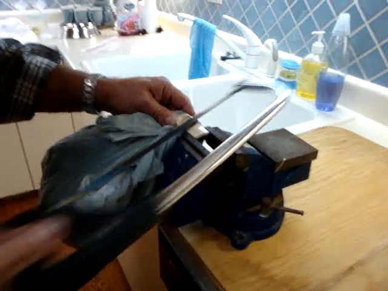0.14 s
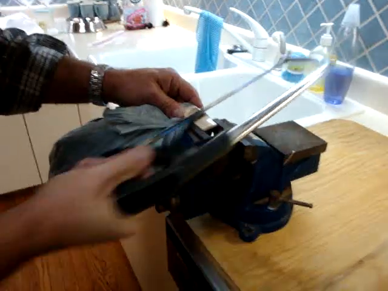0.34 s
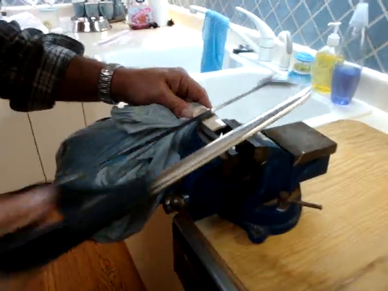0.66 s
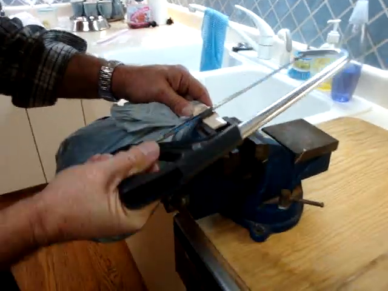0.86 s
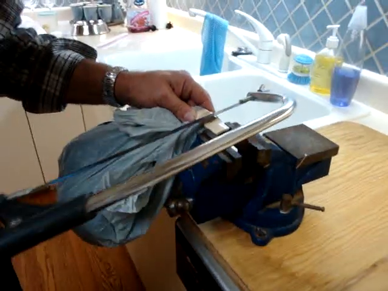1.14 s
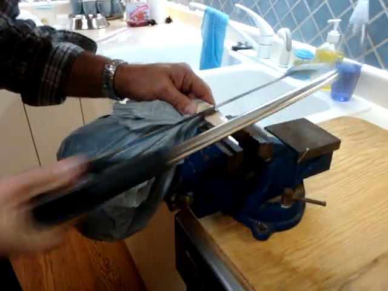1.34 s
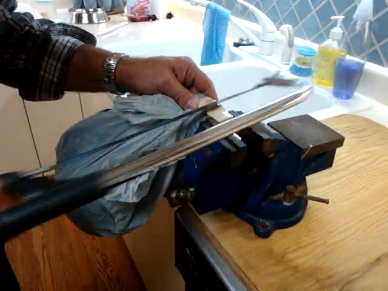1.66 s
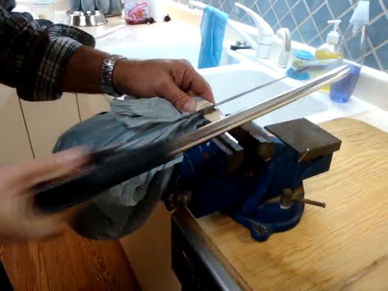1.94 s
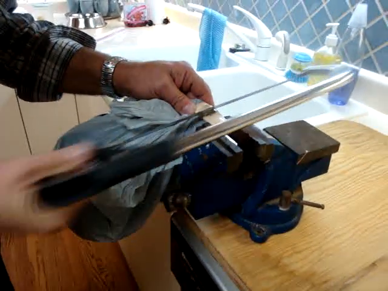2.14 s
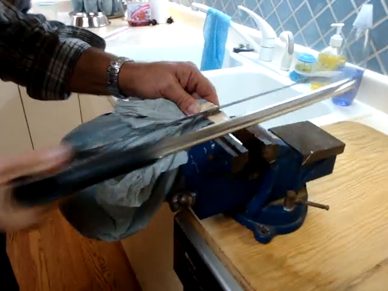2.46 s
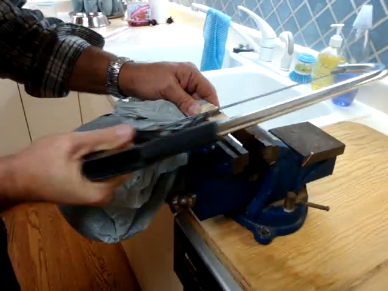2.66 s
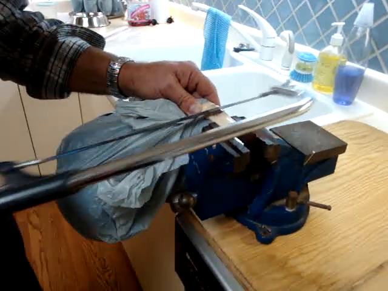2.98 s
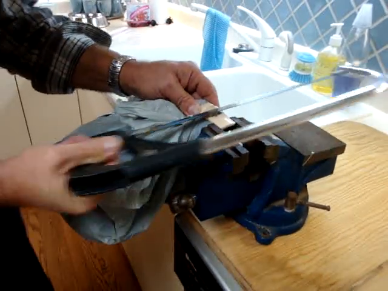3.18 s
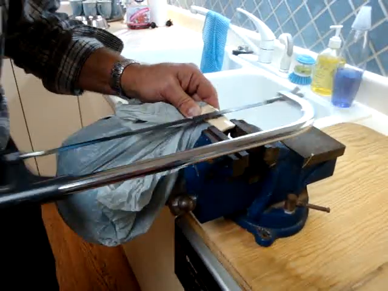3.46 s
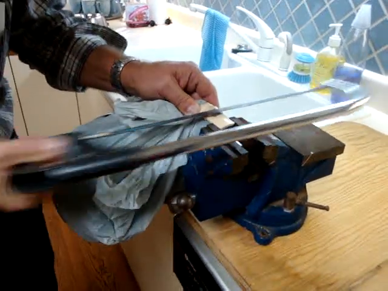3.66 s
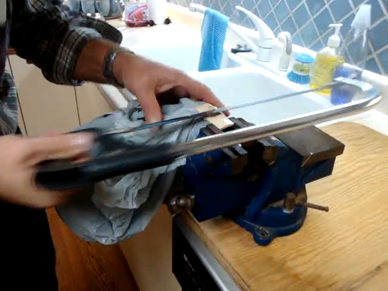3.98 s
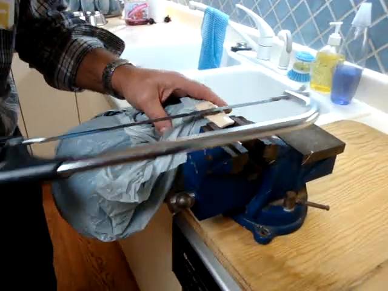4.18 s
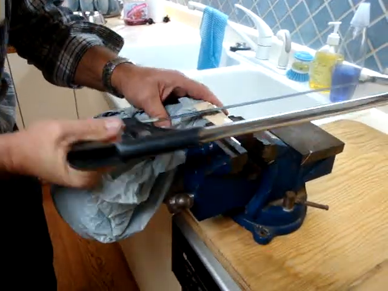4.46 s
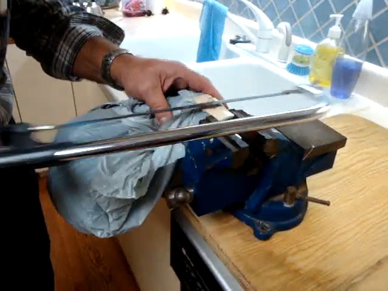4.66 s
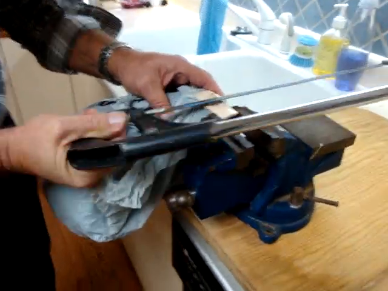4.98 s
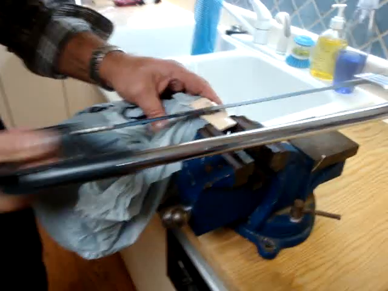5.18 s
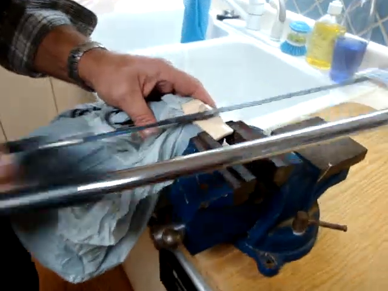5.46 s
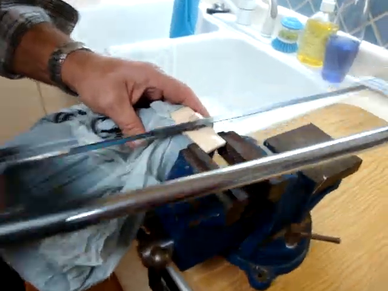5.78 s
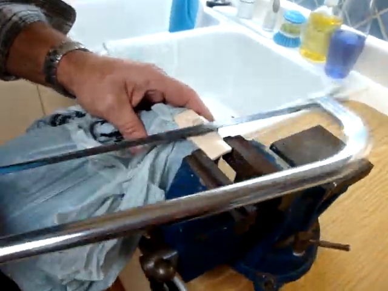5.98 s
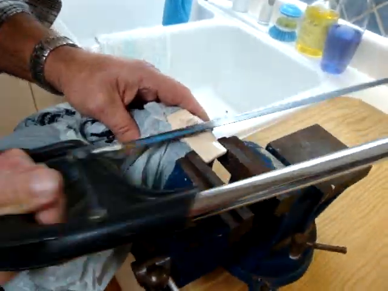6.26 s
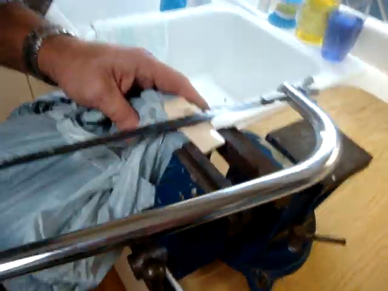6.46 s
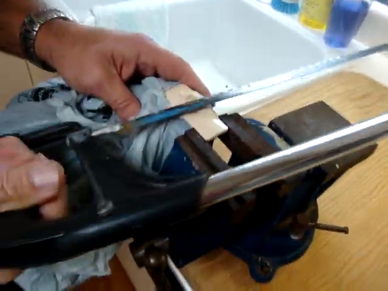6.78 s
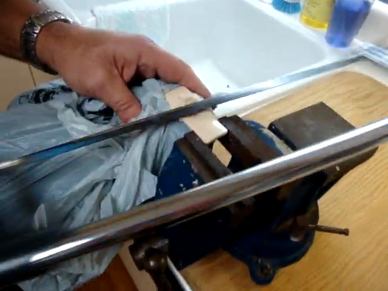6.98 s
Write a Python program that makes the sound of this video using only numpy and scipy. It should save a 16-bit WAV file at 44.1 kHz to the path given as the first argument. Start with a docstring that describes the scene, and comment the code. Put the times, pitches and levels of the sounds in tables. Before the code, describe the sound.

Close, rough sawing of a small hard piece, about three and a half gritty strokes a second, each with a gliding groan, and faint fan-like rush behind.

```python
"""A hacksaw cuts a hard plastic piece held in a bench vise, in quick push and pull strokes.
Teeth strike at a rate that follows the blade's speed: a gliding tone, grinding, chip rasp and dust hiss
ring through frame resonances, and now and then the piece chatters with the teeth.
Two dull thumps of the camera being handled are sums of decaying modes; a small hard room answers with
decaying noise tails. An appliance adds wavering hum lines and a steady rush of coloured noise."""
import sys
import numpy as np
from scipy import signal
from scipy.fft import rfft, irfft, next_fast_len
from scipy.io import wavfile
from scipy.ndimage import uniform_filter1d, map_coordinates

SR = 44100
rng = np.random.default_rng(int(sys.argv[2]) if len(sys.argv) > 2 else 0)


def log_audio(samples):
    """Write samples as a 16-bit WAV file to the path given in sys.argv[1]."""
    # one column per channel
    frames = np.atleast_2d(samples).T
    # limit to full scale, then quantise
    limited = np.clip(frames, -1, 1)
    pcm = np.round(limited * 32767).astype(np.int16)
    wavfile.write(sys.argv[1], SR, pcm)


N = 313859
TIME_S = np.arange(N) / SR


def amp(db):
    """Decibels to gain."""
    return 10 ** (np.asarray(db) / 20)


def unit(x):
    """Scale to rms 1."""
    return x / np.sqrt(np.mean(x ** 2) + 1e-20)


def along(points, hz):
    """(hz, value) points interpolated on a log frequency axis."""
    point_hz, value = np.transpose(points)
    return np.interp(np.log(hz + 1), np.log(point_hz + 1), value)


def wobble(rate_hz):
    """Smooth random curve with rate_hz knots a second."""
    knots = rng.standard_normal(int(N * rate_hz / SR) + 4)
    return map_coordinates(knots, [TIME_S * rate_hz])


def filtered(x, response):
    """x times a response of frequency, over a padded FFT."""
    size = next_fast_len(N + SR // 2)
    hz = np.fft.rfftfreq(size, 1 / SR)
    return irfft(rfft(x, size) * response(hz), size)[:N]


def coloured(x, spectrum):
    """x weighted by the given spectrum, at rms 1."""
    return unit(filtered(x, lambda hz: amp(along(spectrum, hz))))


# appliance hum lines: hz, level_db (rms)
HUM_LINES = [(102, -72), (199, -69), (222, -64.5), (291, -63), (399, -57.5), (528, -56.5), (630, -56),
             (848, -54)]
# spectrum of the air rush: hz, density_db (dB per Hz, relative)
AIR_SPECTRUM = [(20, -27), (40, -35), (65, -11.5), (100, -11.5), (135, -9), (200, 7), (260, 2), (400, 4.5),
                (600, 1), (850, -12), (1300, -6.5), (2200, -22), (4000, -21), (10000, -68)]


def appliance(waver_rad=0.84):
    """Steady rush of air under hum lines of slightly wandering phase."""
    hum = np.zeros(N)
    for hz, level_db in HUM_LINES:
        phase = 2 * np.pi * hz * TIME_S + waver_rad * wobble(12)
        hum += amp(level_db) * np.sqrt(2) * np.sin(phase)
    return hum + amp(-50) * coloured(rng.standard_normal(N), AIR_SPECTRUM)


# decay of the room: hz, t60_s
ROOM_DECAY = [(200, 0.41), (1500, 0.15), (10000, 0.06)]


def room(x, count=20):
    """Short random tails, treble dying first, crossfaded so that no single tail colours the whole."""
    out = np.zeros(N)
    for k in range(count):
        distance = np.abs(np.linspace(0, count - 1, N) - k)
        share = np.sqrt(np.maximum(1 - distance, 0))
        live = np.flatnonzero(share)
        first = live[0]
        hz, t_s, noise = signal.stft(rng.standard_normal(SR // 2), SR, nperseg=256)
        decay = amp(-60 * t_s / along(ROOM_DECAY, hz)[:, None])
        tail = signal.istft(noise * decay, SR, nperseg=256)[1]
        tail /= np.linalg.norm(tail)
        answer = signal.fftconvolve(x[live] * share[live], tail)[:N - first]
        out[first:first + len(answer)] += answer
    return out


# dull thumps of the camera being handled: start_s, level_db (relative)
HANDLING_THUMPS = [(5.404, -35), (5.744, -41)]
# modes of a thump: hz, level_db (relative), t60_s
THUMP_MODES = [(92.46, -16, 0.35), (125, -8, 0.22), (186.4, -10.5, 0.48), (333, 5, 0.072)]


def handling_thumps(attack_s=0.0039):
    """The handled camera thumps dully: low modes ring and decay exponentially."""
    out = np.zeros(N)
    for start_s, thump_db in HANDLING_THUMPS:
        t_s = np.maximum(TIME_S - start_s, 0)
        ring = np.zeros(N)
        for hz, mode_db, t60_s in THUMP_MODES:
            ring += amp(mode_db - 60 * t_s / t60_s) * np.sin(2 * np.pi * hz * t_s)
        out += amp(thump_db) * ring * (1 - np.exp(-t_s / attack_s))
    return out


# resonances of the saw frame and the clamped piece: hz, width_hz, level_db (over the direct sound)
FRAME_MODES = [(587, 47, -11), (762, 220, -5.5), (1067.5, 51, -5.5), (1315, 39, -5.5), (1592, 55, 1.5),
               (1722, 74, 1.5), (1918, 112, 4.5), (2117, 31, -1.5), (2355, 45, 1), (2520, 180, -2.5),
               (2695, 32, -6.5), (2969, 75, 2), (3780, 145, -8), (4620, 150, -11), (5140, 38, -4.5),
               (5500, 41, -1), (6250, 40, -8.5), (6860, 50, -2.5)]


def frame(x):
    """A force heard directly and through the band-pass resonances of frame and piece."""
    def response(f):
        total = 1
        for hz, width_hz, level_db in FRAME_MODES:
            damping = 1j * f * width_hz
            total = total + amp(level_db) * damping / (hz * hz - f * f + damping)
        return total

    return filtered(x, response)


LAST_STOP_S = 7.17  # end of the last stroke


def stroke_phase(start_s, middle_s):
    """Strokes done so far: whole at every turn, a half at the given moment inside each stroke."""
    marks_s = np.append(np.column_stack([start_s, middle_s]), LAST_STOP_S)
    return np.interp(TIME_S, marks_s, np.arange(len(marks_s)) / 2)


# strokes, pull and push in turn: start_s, fastest_s, hardest_s (hardest press), top_hz (tooth rate),
# sing_db (tone clarity), bite_db, rasp_db, hiss_db, turn_db (scrape at the turn before); levels relative
SAW_STROKES = [(-0.22, -0.06, -0.067, 1000.0, 0.0, -30.0, -32.0, -44.0, -53.0),
               (0.06, 0.219, 0.21, 1320.0, 3.0, -30.5, -28.5, -39.0, -56.5),
               (0.369, 0.512, 0.485, 1050.0, 8.5, -30.5, -31.5, -39.0, -53.5),
               (0.649, 0.805, 0.824, 1050.0, -5.0, -31.5, -31.5, -39.5, -54.0),
               (0.939, 1.084, 1.025, 1090.0, 1.0, -27.5, -33.0, -38.0, -57.5),
               (1.236, 1.388, 1.423, 1110.0, 1.5, -31.0, -30.5, -33.5, -57.0),
               (1.519, 1.674, 1.62, 990.0, 3.5, -34.0, -35.5, -38.5, -55.5),
               (1.82, 1.99, 1.965, 1120.0, -2.5, -29.5, -28.0, -30.0, -57.5),
               (2.107, 2.248, 2.215, 950.0, -2.0, -35.0, -36.5, -43.0, -52.5),
               (2.395, 2.557, 2.598, 980.0, -2.0, -30.0, -29.5, -33.0, -53.0),
               (2.688, 2.849, 2.81, 960.0, 0.5, -36.0, -36.5, -39.5, -55.5),
               (3.002, 3.155, 3.197, 880.0, -0.5, -34.5, -31.5, -35.0, -55.0),
               (3.31, 3.461, 3.402, 910.0, -2.0, -33.5, -37.0, -37.0, -56.5),
               (3.598, 3.74, 3.776, 830.0, -2.5, -30.5, -32.5, -34.0, -53.0),
               (3.88, 4.093, 4.088, 730.0, 2.0, -36.0, -38.0, -37.0, -49.0),
               (4.245, 4.359, 4.402, 950.0, -4.0, -28.0, -32.5, -34.0, -49.5),
               (4.512, 4.651, 4.612, 820.0, 2.0, -35.0, -35.5, -41.5, -50.5),
               (4.808, 4.938, 4.974, 990.0, -7.0, -27.5, -32.5, -33.5, -49.5),
               (5.092, 5.265, 5.218, 1120.0, -1.5, -32.5, -34.5, -40.5, -51.5),
               (5.4, 5.555, 5.578, 1090.0, -2.0, -27.5, -32.0, -34.5, -57.0),
               (5.694, 5.86, 5.775, 1000.0, 1.0, -32.5, -33.0, -38.5, -58.5),
               (5.988, 6.139, 6.167, 1140.0, -1.0, -31.5, -31.5, -33.5, -54.0),
               (6.26, 6.425, 6.385, 980.0, -2.0, -28.5, -32.0, -36.5, -51.5),
               (6.578, 6.728, 6.745, 1080.0, -1.5, -29.0, -31.5, -36.0, -52.5),
               (6.864, 7.034, 6.98, 1030.0, 1.0, -30.0, -33.0, -38.5, -53.0)]


def arm(fullness=.8, clog_db=6):
    """Tooth rate (Hz) and singing (dB): the arm speeds up from rest and slows again in every stroke."""
    start_s, fastest_s, _, top_hz, sing_db = np.transpose(SAW_STROKES)[:5]
    swing = stroke_phase(start_s, fastest_s)
    stroke = np.minimum(swing.astype(int), len(start_s) - 1)
    tooth_hz = top_hz[stroke] * np.abs(np.sin(np.pi * swing)) ** fullness
    # chips fill the teeth late in a stroke and dull the tone
    clogging_db = clog_db * np.maximum(2 * (swing % 1) - 1, 0)
    return tooth_hz, sing_db[stroke] - clogging_db


# swell exponent factors: pull's quick start, its long fade, push's long build, its quick stop
SWELL_LEAN = [1.1, .88, .88, 1.2]
TURN_BITE_DB, TURN_HISS_DB = 8, -0.5  # over the scrape at the turn
BITE_HOLD, RASP_HOLD, HISS_HOLD = 1.65, 1.9, 1.25  # swell exponents: 1 is pointed, more stays near its top
EASE_S = .02  # averaging window: the hand changes its force no faster


def pressure(unsteady_db=.5, grab_db=1.0, dust_db=1.6):
    """Bite, rasp and hiss (dB) swell from each turn to the hardest press and sink back."""
    start_s, _, hardest_s, _, _, bite_db, rasp_db, hiss_db, turn_db = np.transpose(SAW_STROKES)
    press = stroke_phase(start_s, hardest_s)
    stroke = np.minimum(press.astype(int), len(start_s) - 1)
    slack = np.abs(2 * (press % 1) - 1)  # 1 at a turn, 0 at the hardest press
    lean = np.take(SWELL_LEAN, (2 * press).astype(int), mode="wrap")
    scrape_db = np.interp(TIME_S, start_s, turn_db)
    hand_db = unsteady_db * wobble(28)

    def swell(top_db, bottom_db, hold):
        """Rise from bottom to top and sink back."""
        peak_db = top_db[stroke]
        level_db = peak_db + (bottom_db - peak_db) * slack ** (hold * lean)
        return uniform_filter1d(level_db, size=int(EASE_S * SR)) + hand_db

    bite = swell(bite_db, scrape_db + TURN_BITE_DB, BITE_HOLD) + grab_db * wobble(45)
    rasp = swell(rasp_db, scrape_db, RASP_HOLD)
    hiss = swell(hiss_db, scrape_db + TURN_HISS_DB, HISS_HOLD) + dust_db * wobble(45)
    return bite, rasp, hiss


def tooth_blows(turns, scatter_db):
    """One pulse of random size each time a tooth meets the edge of the cut."""
    passing = np.diff(np.floor(turns), prepend=0)
    return passing * amp(scatter_db * rng.standard_normal(N))


def chips(turns, life_turns, clump_db):
    """Each tooth tears off a noise burst of clumped crumbs that sinks, a little or a lot, until the next."""
    burst = np.exp(-(turns % 1) / life_turns)
    return unit(rng.standard_normal(N) * burst * amp(clump_db * wobble(350)))


def partial(turns, order, rough_rad, fitful_db):
    """One harmonic of the tooth rate; the piece rocks in the vise, so its size and phase stagger."""
    size = amp(fitful_db * wobble(70))
    return size * np.sin(2 * np.pi * order * turns + rough_rad * wobble(160))


# modes of the piece that groan as the tooth rate sweeps through: hz, half_width_hz, level_db (over the bite)
PIECE_GROANS = [(600, 50, -4.5), (780, 35, -2), (1070, 30, -10)]


def groan(tooth_hz):
    """Extra flexing (gain) while the teeth keep time with a mode of the piece."""
    return sum(amp(level_db) * np.exp(-((tooth_hz - hz) / half_width_hz) ** 2)
               for hz, half_width_hz, level_db in PIECE_GROANS)


# the blade catches hard and the piece chatters a few cycles: centre_s, pitch_hz, level_db, half_length_s
CHATTER_BURSTS = [(0.133, 1670, -27.5, .009), (0.212, 1310, -29, .01), (0.451, 810, -23.5, .011),
                  (0.507, 1046, -22.5, .0053), (0.525, 1050, -19.5, .0074), (0.547, 980, -25, .004),
                  (0.769, 3034, -30, .0065), (1.002, 740, -28, .0057), (1.064, 1080, -25, .0039),
                  (1.104, 1070, -30, .0075), (1.594, 720, -27, .006), (1.615, 840, -24, .0074),
                  (1.889, 620, -24.5, .0075), (2.352, 550, -38.5, .0078), (2.479, 630, -33, .012),
                  (3.216, 770, -28.5, .011), (3.388, 672, -28, .0098), (3.668, 600, -32.5, .0071),
                  (3.785, 780, -26.5, .01), (4.174, 560, -34.5, .014), (4.421, 760, -27.5, .0083),
                  (4.597, 696, -26.5, .0083), (4.622, 780, -26, .014), (5.2, 790, -29, .011),
                  (5.787, 780, -30, .0089), (6.108, 1080, -27, .0081), (6.376, 840, -25, .0041),
                  (6.962, 840, -20, .0031)]


def chatter(rate_hz, turns):
    """Short squawks with pitch pulled along by the teeth, and how far they take over the motion (0-1)."""
    out, hold = np.zeros(N), np.zeros(N)
    for centre_s, pitch_hz, level_db, half_length_s in CHATTER_BURSTS:
        near = np.abs(TIME_S - centre_s) < 4 * half_length_s
        swell = np.exp(-((TIME_S[near] - centre_s) / half_length_s) ** 2)
        cycles = turns[near] * pitch_hz / rate_hz[near].mean()
        out[near] += amp(level_db) * swell * np.sin(2 * np.pi * cycles)
        hold[near] = np.maximum(hold[near], swell)
    return np.sqrt(2) * out, hold


# spectra of the grinding body, chip rasp and dust hiss: hz, density_db (dB per Hz, relative)
GRIND_SPECTRUM = [(150, -33.5), (380, -12.5), (510, -6.5), (620, -2), (800, 3), (1100, -1), (1400, -6),
                  (2200, -18.5), (5000, -67)]
RASP_SPECTRUM = [(500, -29), (1200, -10.5), (1650, -3.5), (2100, -1.5), (2850, .5), (3400, -2.5),
                 (4200, -5.5), (5500, -12.5), (10000, -65)]
HISS_SPECTRUM = [(1500, -52), (3500, -5.5), (4800, -3), (6500, -4), (7600, -4.5), (8900, -4.5),
                 (10000, -11)]


def saw(jitter=.018, creep_hz=120):
    """Teeth drive a gliding tone, a grinding body, a rasp of chips and a hiss of dust."""
    bite_db, rasp_db, hiss_db = pressure()
    tooth_hz, sing_db = arm()
    rate_hz = np.maximum(tooth_hz, creep_hz) * (1 + jitter * wobble(170))
    turns = np.cumsum(rate_hz) / SR  # teeth passed so far

    # uneven teeth land a little early or late, which roughens the overtones
    blows = tooth_blows(turns + .075 * wobble(260), scatter_db=2.6)
    blows = unit(blows * amp(0.28 * sing_db + 2.14 * wobble(60)))

    grind_force = chips(turns, life_turns=0.71, clump_db=0.5)
    grind = amp(bite_db - 6.7) * coloured(frame(grind_force), GRIND_SPECTRUM)
    rasp_force = 0.74 * blows + chips(turns, life_turns=1.0, clump_db=1.9)
    rasp = amp(rasp_db - 0.25) * coloured(frame(rasp_force), RASP_SPECTRUM)
    hiss_force = chips(turns, life_turns=3.1, clump_db=2.2)
    hiss = amp(hiss_db + 1.8) * coloured(frame(hiss_force), HISS_SPECTRUM)

    # the piece flexes once per tooth, in fits and starts, with a rough octave above
    squawks, hold = chatter(rate_hz, turns)
    flex_gain = (1 - hold) * amp(bite_db - 3.0) * np.hypot(amp(sing_db), groan(tooth_hz))
    flex = flex_gain * partial(turns, order=1, rough_rad=.68, fitful_db=1.8)
    octave_gain = amp(rasp_db + 0.8 * sing_db - 12)
    octave = octave_gain * partial(turns, order=2, rough_rad=1.4, fitful_db=3.5)

    # so small a piece radiates slow flexing poorly: (hz, gain_db)
    radiation = [(150, -45), (430, -10), (600, -0.5), (1300, 0)]
    tone = filtered(flex + octave, lambda hz: amp(along(radiation, hz)))
    return grind + rasp + hiss + amp(-2) * frame(tone) + squawks


def scene():
    """The saw, close by, and the camera thumps, in the humming room."""
    work = saw() + handling_thumps()
    return (work + amp(-10.5) * room(work) + appliance())[None]


def record(dry, top_hz=10100):
    """Sharp band limit: nothing passes at or above top_hz."""
    return filtered(dry[0], lambda hz: hz < top_hz)[None]


dry = scene()
out = record(dry)
log_audio(out)
```